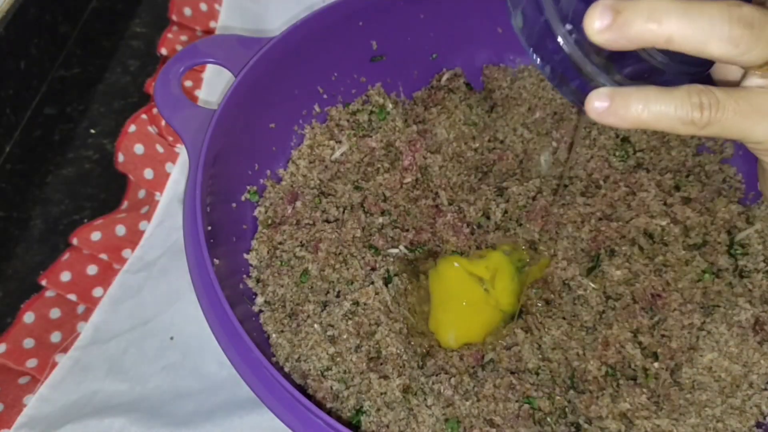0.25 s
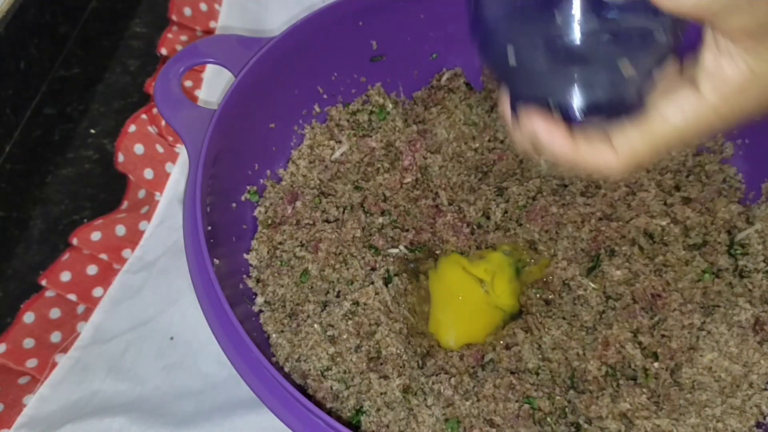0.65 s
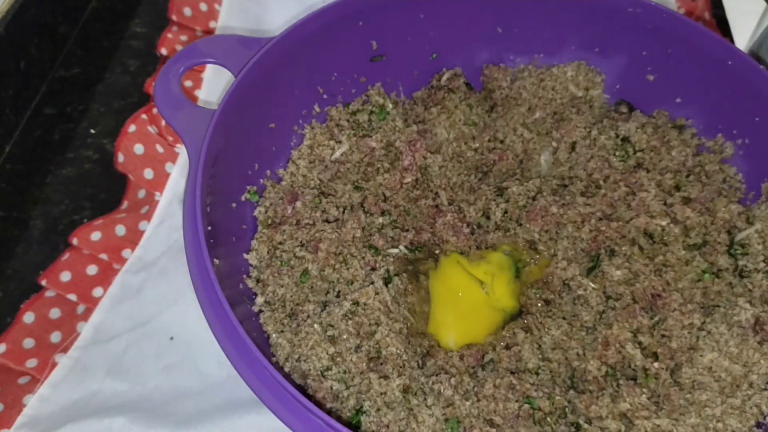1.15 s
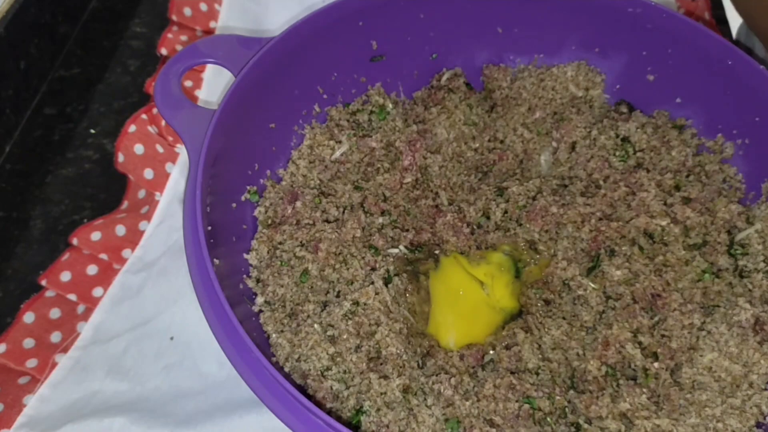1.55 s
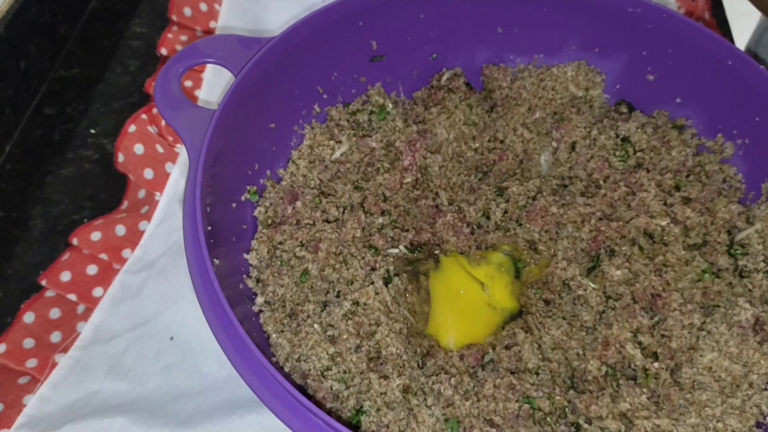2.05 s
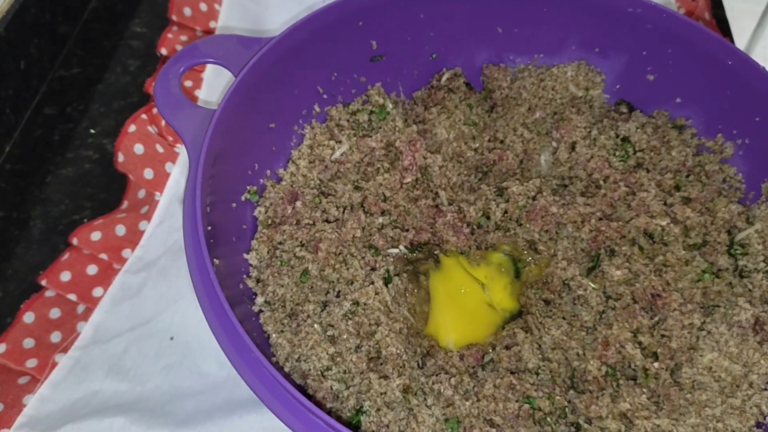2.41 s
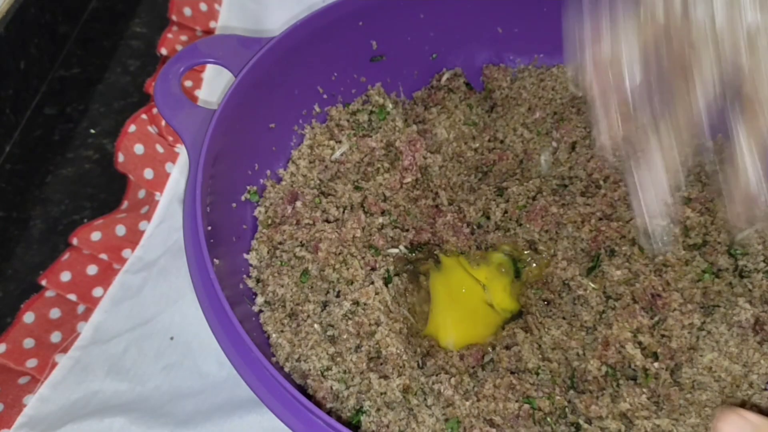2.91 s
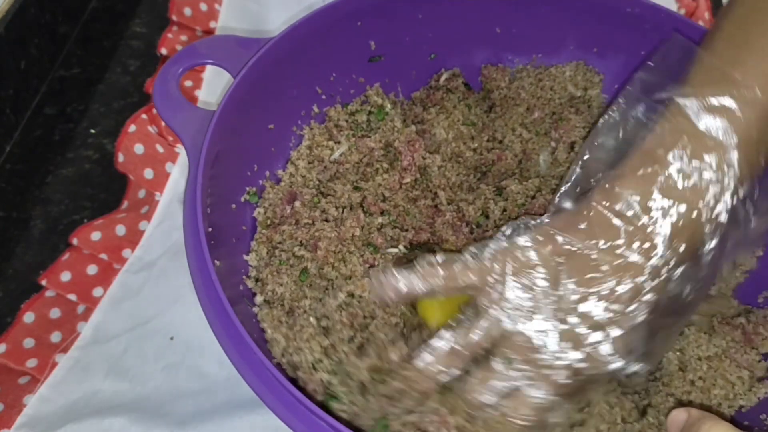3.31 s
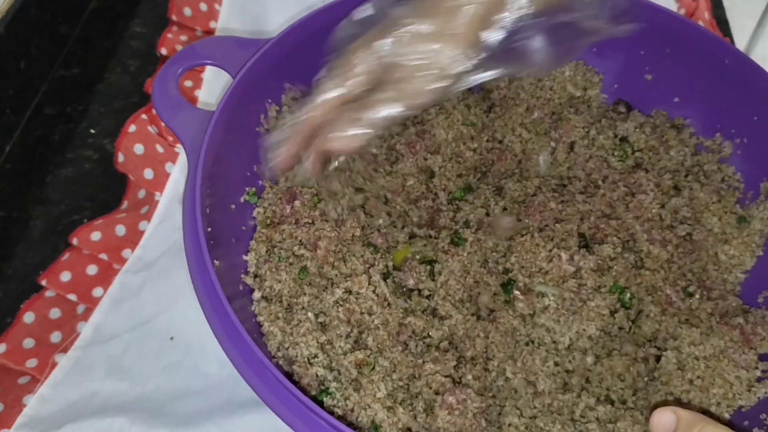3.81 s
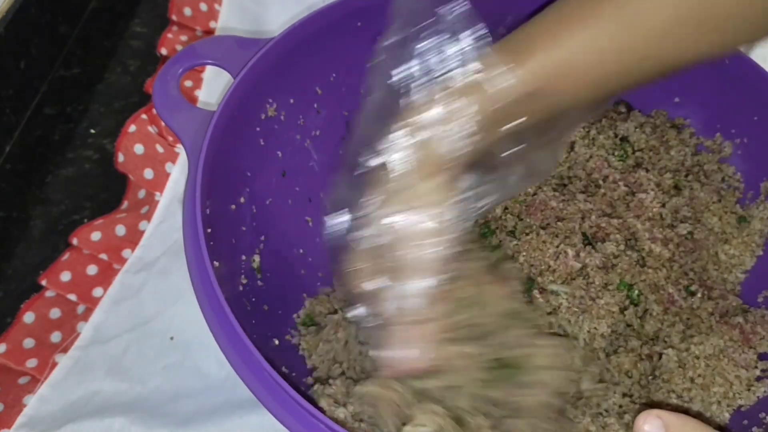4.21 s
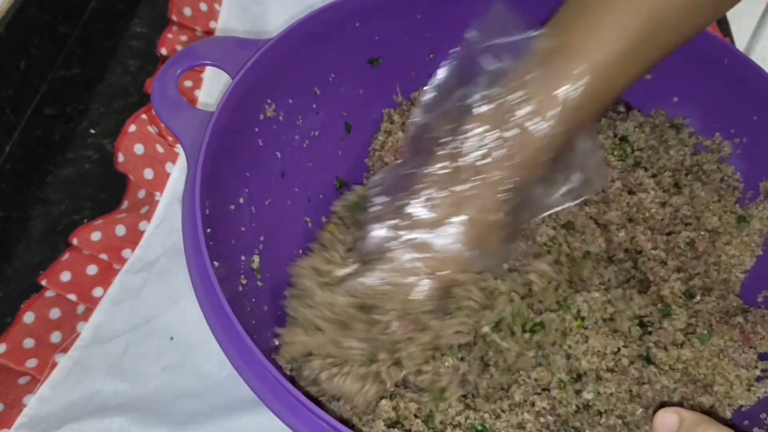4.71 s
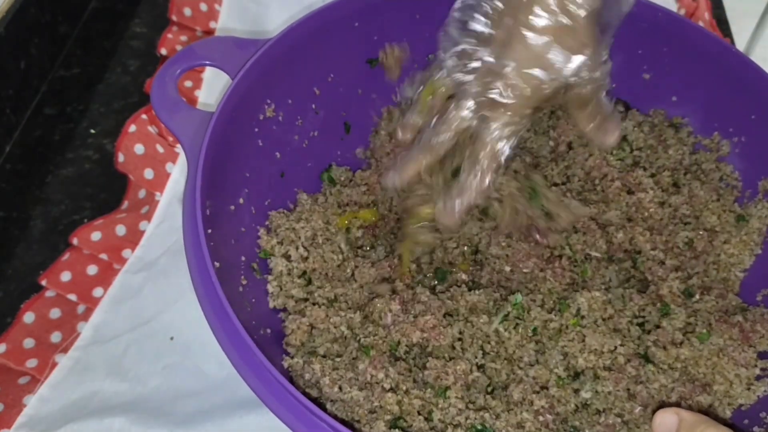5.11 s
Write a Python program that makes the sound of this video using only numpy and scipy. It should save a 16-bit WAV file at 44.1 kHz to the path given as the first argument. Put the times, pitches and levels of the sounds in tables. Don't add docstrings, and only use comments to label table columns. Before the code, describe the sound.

Close phone pickup in a reflective kitchen with a steady low drone behind. First come faint film ticks, tiny glass touches and short squeaks, then a dish is set down hard and dragged briefly. Another hard clink coincides with a hollow cupboard-like knock and small bounces. From about three seconds, brisk gloved strokes crackle, squish and crunch through damp grain, rubbing the bowl wall.

```python
import sys
import numpy as np
from scipy import signal
from scipy.fft import rfft, irfft, next_fast_len
from scipy.io import wavfile
from scipy.ndimage import uniform_filter1d, map_coordinates

SR = 44100
rng = np.random.default_rng(int(sys.argv[2]) if len(sys.argv) > 2 else 0)


def to_wav(s):
    ch = np.atleast_2d(s).T
    pcm = np.round(np.clip(ch, -1, 1) * 32767)
    wavfile.write(sys.argv[1], SR, pcm.astype(np.int16))


def gain_from_decibels(decibels):
    exponent = np.asarray(decibels, float) / 20
    return 10 ** exponent


N = 235931

# frequency in Hz, level in dB per Hz.
HUM_SPECTRUM = [(15, -79), (25, -83), (59, -7.5), (95, -14), (118, -10), (318, -8.5), (344, -8),
                (474, -11.5), (709, -14.5), (1090, -20), (4030, -24), (4490, -26.5), (5560, -30),
                (13500, -38), (15000, -59)]
# frequency in Hz, width in Hz, level in dB.
HUM_BANDS = [(69.5, 3.1, 8), (131, 39, 8), (206.8, 26, 2.5), (285, 19, 5), (361.7, 5.167, 12),
             (4550, 22, 9)]

# start in seconds, peak in dB, panel boom in dB, hard edge in dB.
KNOCKS = [
    (2.337, -9.5, -18, -13.5),
    (2.421, -31, -14, -3),
    (2.563, -28.5, -16.5, -12.5),
    (2.951, -69.5, -16.5, -6),
]
# frequency in Hz, width in Hz, level in dB.
PANEL_MODES = [(95, 48, -12), (162, 56, -8), (233.33, 36, -4), (303.6, 12, 2.5), (422.2, 9.1, 9),
               (557, 31, -1), (696, 105, -3)]
# frequency in Hz, width in Hz, level in dB.
CATCH_MODES = [(937, 180, -3), (1123, 258, 7.5), (1278, 216, 4.5), (1460, 22, 6.5), (1620, 77, 2),
               (1950, 380, -3)]
# frequency in Hz, width in Hz, level in dB.
EDGE_MODES = [(2780, 750, 6), (3550, 780, 6), (5560, 605.6, -2.5), (7750, 220, -27)]

# start in seconds, peak in dB, then low, middle and high modes in dB.
CLINKS = [
    (0.831, -55, -17, -24.5, -4),
    (1.2166, -38.5, -54.5, -10, 2.5),
    (1.3543, -25, -23, -19, -5),
    (1.7034, -25, -32.5, -38, -3.5),
    (1.7162, -5.5, -11.5, -26.5, -13.5),
    (1.744, -19.5, -24, -11, -9),
    (1.8495, -21, -10, -20, -17),
    (2.1844, -51, -9, -17, 3),
    (2.3382, -6, -26, -33, -25.5),
    (2.5631, -18.5, -13.5, -16, -11),
]
# frequency in Hz, width in Hz, level in dB.
GLASS_MODES = [(1123, 33, -12), (2140, 69, 8), (2320, 370, 0.5), (2740, 280, -2.5), (3330, 380, -6),
               (4660, 110, -10), (5560, 51, 2.5), (6580, 200, -10), (7880, 60, -11), (9870, 100, 0),
               (10720, 63.2, -6), (11680, 100, -3), (13210, 50, 5), (13200, 280, 1)]
# start in seconds, level in dB, pitch in Hz, length in seconds.
CHIRPS = [
    (1.218, -45.5, 2143, 0.022),
    (1.272, -46, 1900, 0.014),
    (1.28, -43, 1506, 0.0101),
    (1.34, -55, 1506, 0.012),
]
# start in seconds, length in seconds, level in dB, swell in dB.
DRAGS = [
    (1.345, 0.1203, -51, 2),
    (1.508, .04, -53, 14),
    (1.686, 0.12, -32.5, -9),
    (1.807, .06, -42.5, 4.5),
]

# start in seconds, peak in dB.
SNAPS = [
    (0.6579, -51),
    (1.066, -45),
    (1.524, -29),
    (3.1046, -23),
    (3.25, -20),
    (3.714, -28),
    (3.8836, -28),
    (3.9024, -29),
    (4.365, -32.5),
    (4.8354, -21.5),
]
# start in seconds, length in seconds, effort in dB,
# swell over the stroke in dB, contact with the bowl wall in dB.
STROKES = [(0.555, 0.9, -76, 15, -4.5), (1.035, 0.39, -68, 13.5, -13), (1.348, .11, -53, 5.5, -15),
           (1.482, 0.036, -49, 2.5, -16.5), (1.506, 0.25, -46.5, -3, -13), (1.693, 0.18, -43, -7, -4.5),
           (1.862, 0.5, -52.5, -18.5, -15.5), (2.33, 0.26, -55.5, 7.5, -1), (2.55, 0.21, -48, -7, 2),
           (2.705, 0.5768, -50, -4.5, -24), (3.063, 0.039, -49.5, 8, -10), (3.094, 0.066, -32, -3, -5),
           (3.17, 0.061, -40, -1, 1.5), (3.235, 0.31, -37.5, -10.5, -2.5), (3.539, 0.13, -41, -4.5, -11),
           (3.675, 0.25, -47, 3, -29), (3.874, 0.31, -39.5, -0.5, 1.5), (4.206, 0.14, -46, -3.5, -3.5),
           (4.331, 0.0982, -48, 8, -15), (4.452, 0.31, -44.5, 8, -18.5), (4.783, 0.06, -39, 3, -13),
           (4.869, 0.16, -43, 0.5, -7.5), (5.023, 0.19, -36.5, -6.5, -14.5), (5.211, 0.12, -42, 5.5, -9)]
# frequency in Hz, level in dB per Hz.
FILM_SPECTRUM = [(3500, -28), (6000, -7), (7000, -19), (9000, 0), (11200, -1), (11700, 7.5), (12500, 5.5),
                 (13700, 6), (14400, -15)]
# frequency in Hz, level in dB per Hz.
CRUNCH_SPECTRUM = [(410, -10.5), (700, -3), (1070, -8.5), (1910, -3), (2590, -1), (4570, 0.5), (5750, -2),
                   (6560, -0.5), (9500, -7), (12400, -8), (20900, -120)]
# frequency in Hz, width in Hz, level in dB.
BOWL_MODES = [(1064, 380, -7.5), (1217, 179.5, 0), (1460, 380, -5), (1900, 210, -4), (2500, 760, -11.5)]
# frequency in Hz, width in Hz, level in dB.
BOWL_LOW_MODES = [(175.68, 91, -6), (339, 19, 2), (417.68, 35, 3), (604.9, 203.66, -3)]

# frequency in Hz, left-right likeness from 0 to 1.
LIKENESS = [(40, 0.6), (150, 0.7008), (300, 0.74), (600, 0.24), (1500, 0.022), (5000, 0.03364)]
# frequency in Hz, time to fall 60 dB in seconds.
KITCHEN_T60 = [(100, 0.54), (500, 0.95), (2000, 0.81), (6000, 0.71), (14000, 0.23)]
# frequency in Hz, left over right in dB.
PORT_COLOUR = [(60, 1), (150, 3), (370, -1.5), (1000, 0), (4300, -1), (6700, -4.5), (7300, -3),
               (8000, -9.5), (10000, 6), (13000, 12.5)]


def unit(x):
    return x / np.sqrt(np.mean(x ** 2) + 1e-20)


def along(points, hz):
    f, v = np.transpose(points)
    return np.interp(np.log(hz + 1), np.log(f + 1), v)


def wobble(rate):
    knots = rng.standard_normal(int(N * rate / SR) + 4)
    return map_coordinates(knots, [np.arange(N) * rate / SR])


def filtered(x, response):
    n = x.shape[-1]
    m = next_fast_len(n + SR // 2)
    return irfft(rfft(x, m) * response(np.fft.rfftfreq(m, 1 / SR)), m)[..., :n]


def coloured(x, spectrum):
    return filtered(x, lambda hz: gain_from_decibels(along(spectrum, hz)))


def resonances(modes):
    def response(f):
        total = 0
        for k, (centre, width, db) in enumerate(modes):
            loss = 1j * f * width
            total = total + (-1) ** k * gain_from_decibels(db) * loss / (centre * centre - f * f + loss)
        return total
    return response


def alike(pair):
    def mid_side(hz):
        turn = np.arccos(np.clip(along(LIKENESS, hz), -1, 1)) / 2
        return np.array([np.cos(turn), np.sin(turn)])
    mid, side = filtered(pair, mid_side)
    return np.array([mid + side, mid - side])


def room(x, seconds=1.2):
    noise = alike(rng.standard_normal((2, int(seconds * SR))))
    hz, t, z = signal.stft(noise, SR, nperseg=256)
    late = gain_from_decibels(-60 * t / along(KITCHEN_T60, hz)[:, None])
    early = 0.77 * gain_from_decibels(-60 * t / 0.079)
    tail = signal.istft(z * (late + early), SR, nperseg=256)[1]
    delayed = np.pad(x, (90, 0))[None]
    return signal.fftconvolve(delayed, tail / np.linalg.norm(tail[0]), axes=1)[:, :len(x)]


def placed(s, dry, wet_db, pan_db, lag):
    out = np.zeros((2, N + len(dry)))
    direct = np.array([np.roll(dry, max(lag, 0)), np.roll(dry, max(-lag, 0))])
    direct = direct * gain_from_decibels([[pan_db], [-pan_db]])
    out[:, round(s * SR):][:, :len(dry)] = direct + gain_from_decibels(wet_db) * room(dry, seconds=1.0)
    return out[:, :N]


def strokes(s, length, db, swell_db, attack_s, release_db):
    t = np.arange(0, N / SR + .002, .001)
    since = t - s[:, None]
    held = np.clip(since / np.abs(length)[:, None], 0, 1)
    released = np.maximum(since - length[:, None], 0)
    level_db = db[:, None] + swell_db[:, None] * held - release_db * released
    gain = gain_from_decibels(level_db) * np.clip(since / attack_s, 0, 1)
    return np.interp(np.arange(N) / SR, t, np.linalg.norm(gain, axis=0))


def grains(count, spread_db, clump_db, smooth, patchy_db):
    when, lag, size, sign = rng.random((count, 4)).T
    size = gain_from_decibels(-spread_db * np.log(size + 0.00409)) * np.sign(sign - .5)
    at = when * (N - 80) + 40 + np.array([[20], [-20]]) * (lag - .5)
    snaps = np.array([np.bincount(port.astype(int), size, N) for port in at])
    clumps = gain_from_decibels(clump_db * (0.53 * wobble(30) + wobble(250)))
    texture = clumps * unit(snaps) + smooth * rng.standard_normal((2, N))
    z = signal.stft(texture, nperseg=512)[2]
    patches = uniform_filter1d(rng.standard_normal(z.shape[1:]), size=4, axis=0)
    patches = uniform_filter1d(patches, size=8, axis=1)
    return unit(signal.istft(z * gain_from_decibels(patchy_db * unit(patches)), nperseg=512)[1][:, :N])


def hum():
    def colour(hz):
        return gain_from_decibels(along(HUM_SPECTRUM, hz)) * (1 + np.abs(resonances(HUM_BANDS)(hz)))
    air = filtered(alike(rng.standard_normal((2, N))), colour)
    return gain_from_decibels(-50.5 + 0.38 * wobble(4.55)) * unit(air)


def cupboard():
    t, total = np.arange(SR) / SR, 0
    for s, db, boom_db, edge_db in KNOCKS:
        rattle = gain_from_decibels(-60 * t / 0.011) * rng.standard_normal(SR) * 0.45
        rattle[:6] += 4
        knock = filtered(rattle, resonances(CATCH_MODES))
        knock = knock + gain_from_decibels(boom_db + 20.5) * filtered(rattle, resonances(PANEL_MODES))
        knock = knock + gain_from_decibels(edge_db + 4.0) * filtered(rattle, resonances(EDGE_MODES))
        total = total + placed(s, gain_from_decibels(db + 5.5) * knock, wet_db=-0.6, pan_db=0.6, lag=-5)
    return total


def clinks():
    t, total = np.arange(SR) / SR, 0
    for s, db, low_db, middle_db, high_db in CLINKS:
        chatter = gain_from_decibels(-60 * t / 0.024) * rng.standard_normal(SR)
        chatter[0] += 7
        modes = []
        for hz, width, mode_db in GLASS_MODES:
            struck_db = low_db if hz < 4000 else middle_db + 13.0 if hz < 8500 else high_db
            modes.append((hz, width, mode_db + rng.normal(0, 1.6) + struck_db))
        click = filtered(chatter, lambda f: 1j * f / (4000 + 1j * f))
        ring = filtered(chatter, resonances(modes)) + gain_from_decibels(high_db - 19) * click
        total = total + placed(s, gain_from_decibels(db + 14) * ring, wet_db=3.0, pan_db=0.4, lag=3)
    return total


def chirps():
    t, total = np.arange(SR) / SR, 0
    for s, db, hz, length in CHIRPS:
        squeak = np.sin(np.pi * np.clip(t / length, 0, 1)) * np.sin(2 * np.pi * hz * t)
        total = total + placed(s, gain_from_decibels(db) * squeak, wet_db=0, pan_db=0.0, lag=9)
    return total


def drags():
    grit = grains(count=15000, spread_db=1, clump_db=-1.0, smooth=0.52, patchy_db=7.5)
    hiss = unit(filtered(grit, resonances(GLASS_MODES[6:])))
    drag = strokes(*np.transpose(DRAGS), attack_s=0.0274, release_db=222) * hiss
    return drag + gain_from_decibels(-2.5) * room(drag[0])


def dish():
    return clinks() + chirps() + drags()


def creases():
    t, bursts = np.arange(2000) / SR, np.zeros((2, N + 2000))
    for s, db in SNAPS:
        snap = gain_from_decibels(db - 0.5 - 60 * t / 0.018) * rng.standard_normal((2, len(t)))
        bursts[:, round(s * SR):][:, :len(t)] += snap
    return coloured(bursts[:, :N], FILM_SPECTRUM)


def hand():
    s, length, db, swell_db, wall_db = np.transpose(STROKES)

    def played(level_db, level_swell_db):
        return strokes(s, length, level_db, level_swell_db, attack_s=.025, release_db=177)

    usual_db, film_grows = -37, 1.044
    crackle = played(usual_db + film_grows * (db - usual_db), film_grows * swell_db)
    effort = played(db, swell_db)
    rub = played(db + wall_db, swell_db)
    shove = played(db + wall_db - 5.5, swell_db - 10.5 * length)

    film = grains(count=40000, spread_db=0.5, clump_db=2.5, smooth=1.0, patchy_db=1.5)
    film = coloured(film, FILM_SPECTRUM)
    crunch = grains(count=40000, spread_db=2.5, clump_db=1.1, smooth=0.98, patchy_db=1.55)
    crunch = coloured(crunch, CRUNCH_SPECTRUM)
    scrape = grains(count=20000, spread_db=2.0, clump_db=2.5, smooth=1.54, patchy_db=0.8)
    scrape = filtered(scrape, resonances(BOWL_MODES))
    push = filtered(alike(rng.standard_normal((2, N))), resonances(BOWL_LOW_MODES))

    near = gain_from_decibels(1.5) * crackle * unit(film) + gain_from_decibels(2.5) * effort * unit(crunch)
    near = near + gain_from_decibels(1.5) * rub * unit(scrape) + shove * unit(push)
    return near + gain_from_decibels(-10) * room(near[1])


def scene():
    return hum() + cupboard() + dish() + creases() + hand()


def top_cut(x):
    return signal.sosfilt(signal.butter(12, 15120, fs=SR, output="sos"), x)


def record(dry):
    def port_response(hz):
        colour = gain_from_decibels(along(PORT_COLOUR, hz) * np.array([[.5], [-.5]]))
        return colour * (hz < 14400) * hz / np.hypot(hz, 40)
    return top_cut(filtered(dry, port_response))


dry = scene()
out = record(dry)
to_wav(out)
```